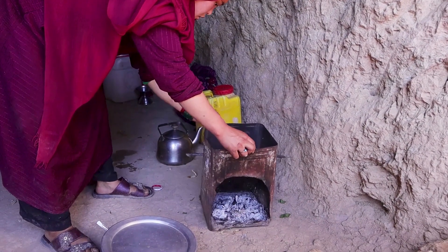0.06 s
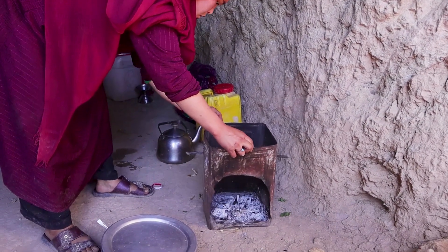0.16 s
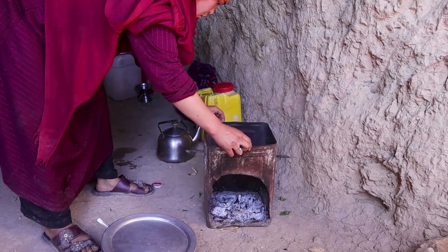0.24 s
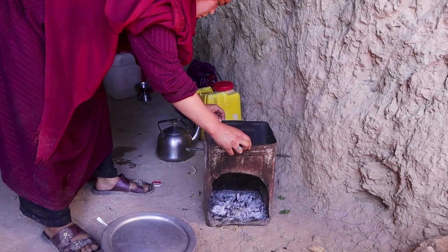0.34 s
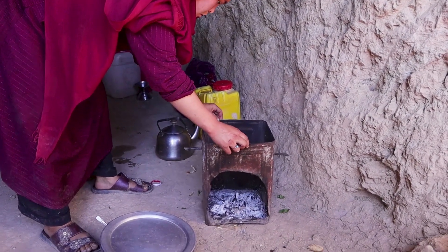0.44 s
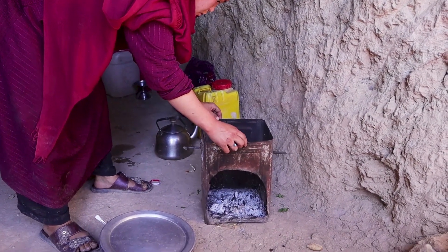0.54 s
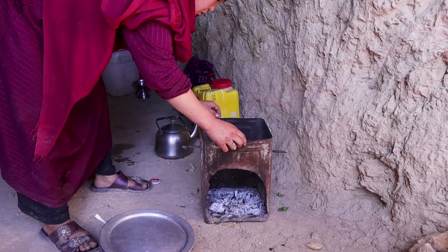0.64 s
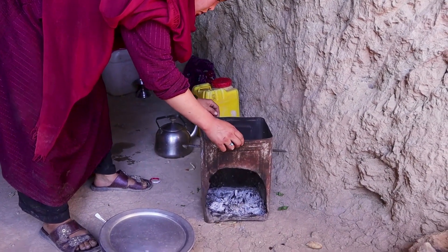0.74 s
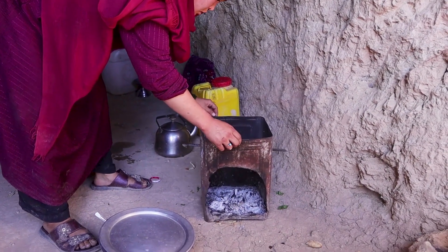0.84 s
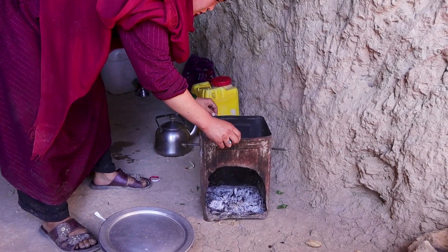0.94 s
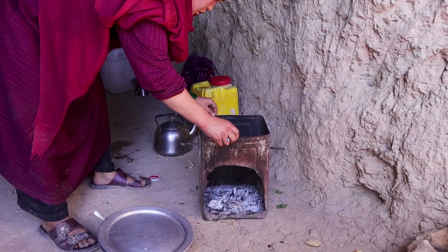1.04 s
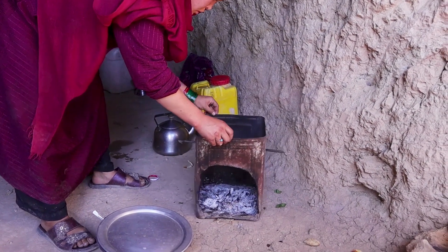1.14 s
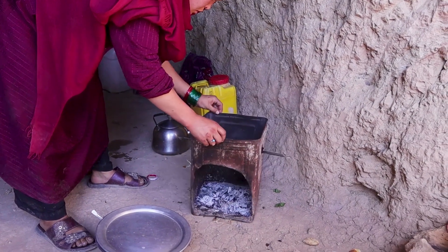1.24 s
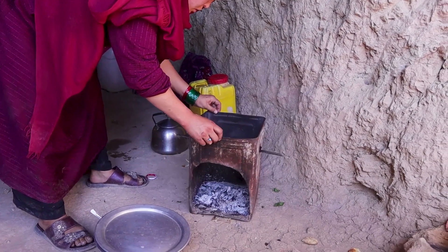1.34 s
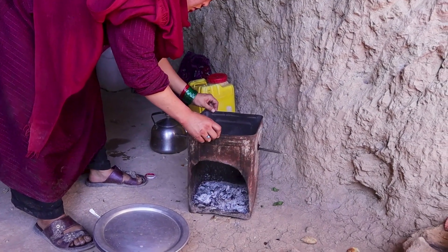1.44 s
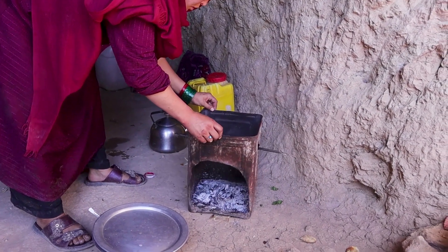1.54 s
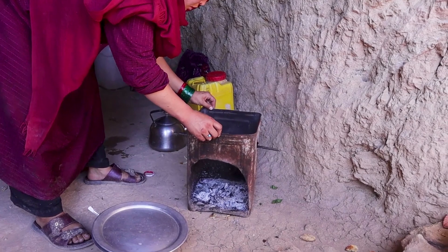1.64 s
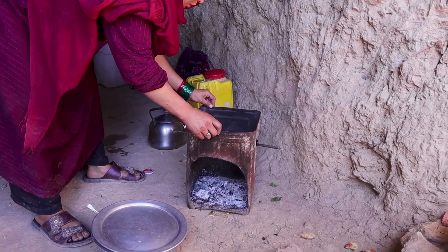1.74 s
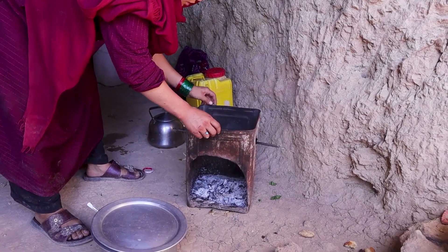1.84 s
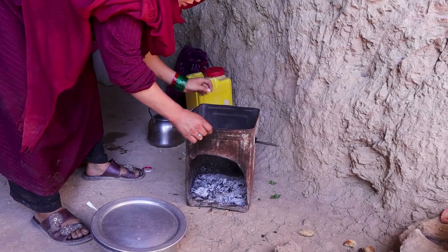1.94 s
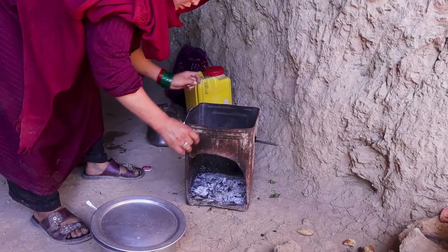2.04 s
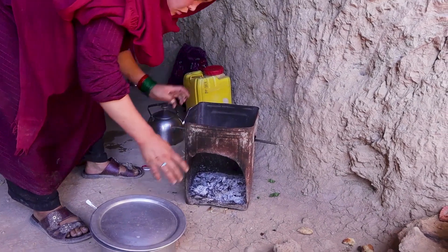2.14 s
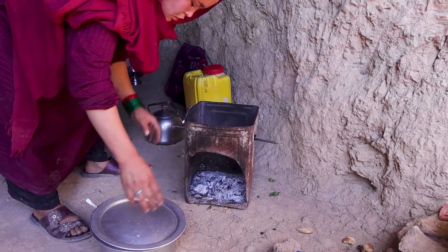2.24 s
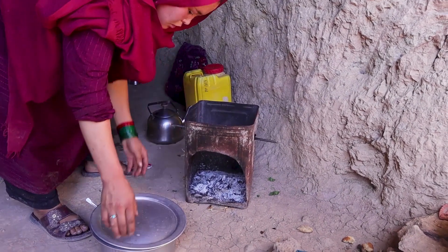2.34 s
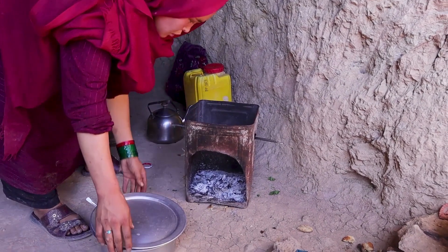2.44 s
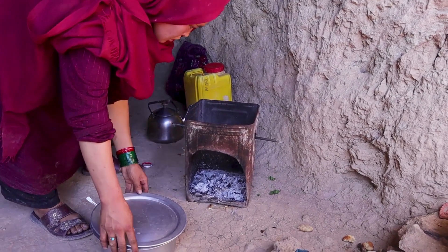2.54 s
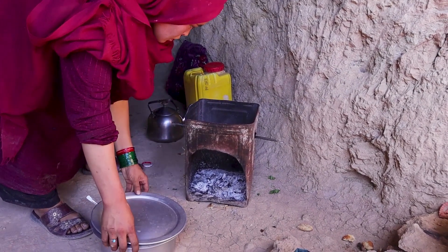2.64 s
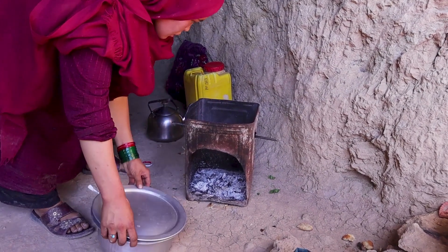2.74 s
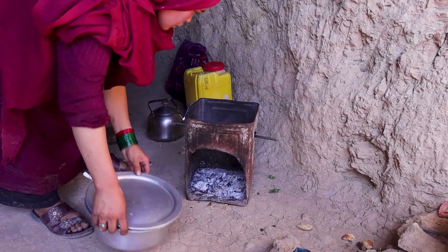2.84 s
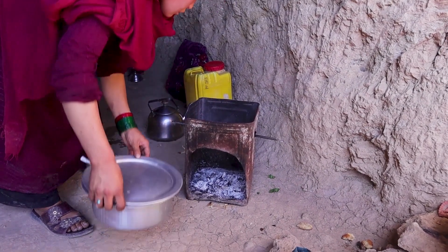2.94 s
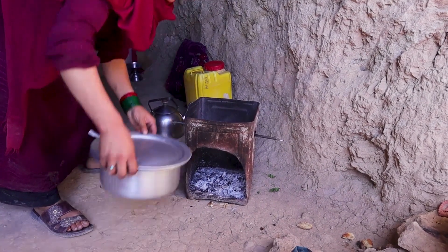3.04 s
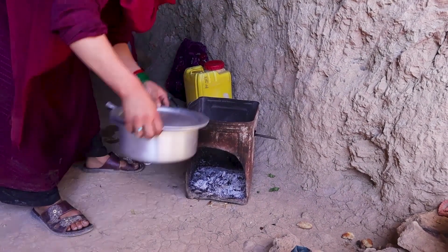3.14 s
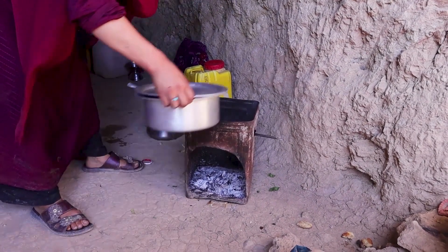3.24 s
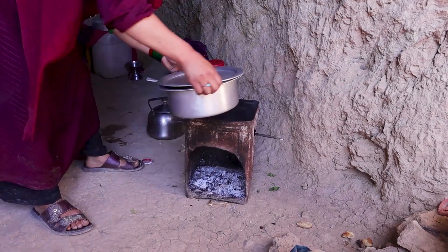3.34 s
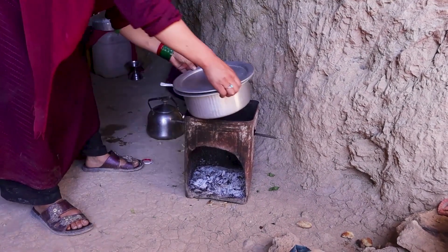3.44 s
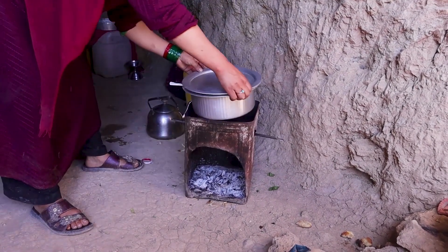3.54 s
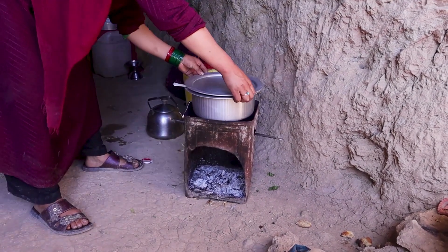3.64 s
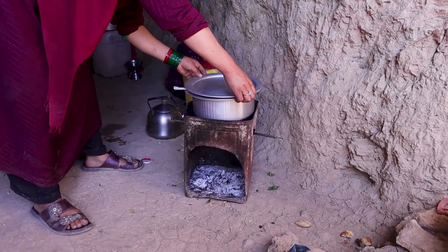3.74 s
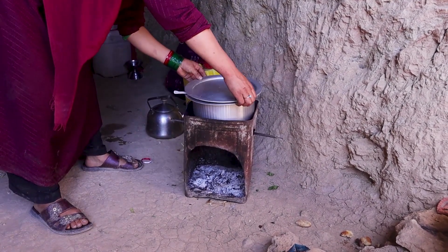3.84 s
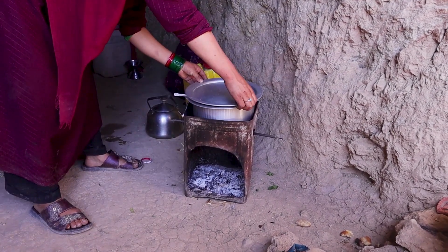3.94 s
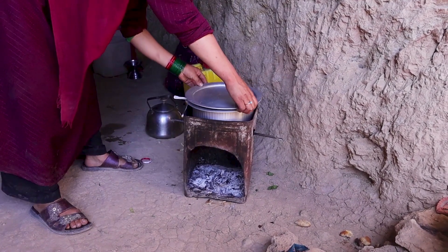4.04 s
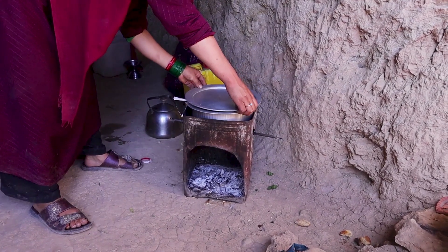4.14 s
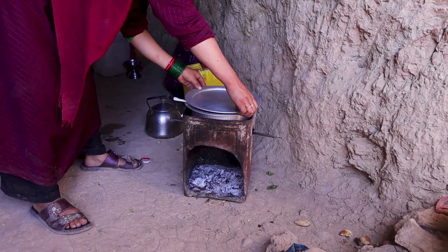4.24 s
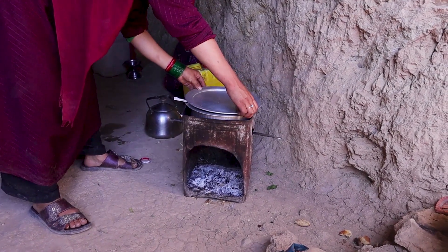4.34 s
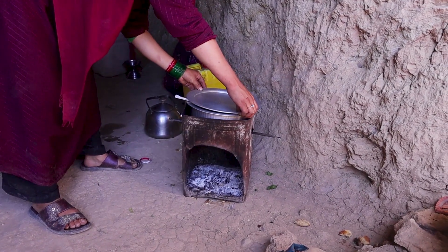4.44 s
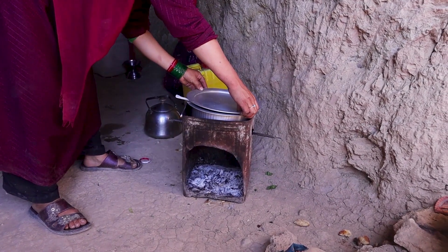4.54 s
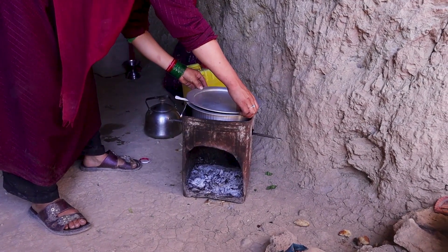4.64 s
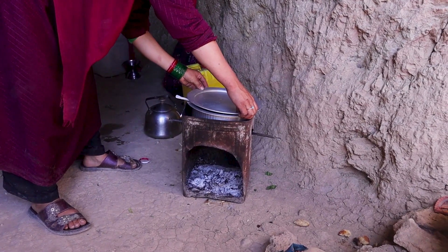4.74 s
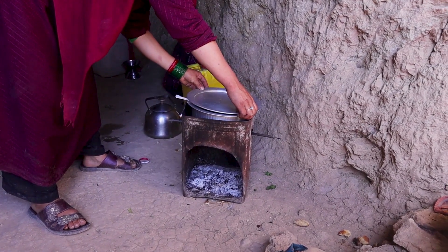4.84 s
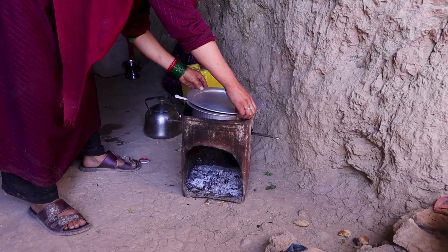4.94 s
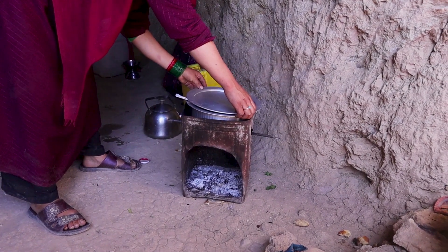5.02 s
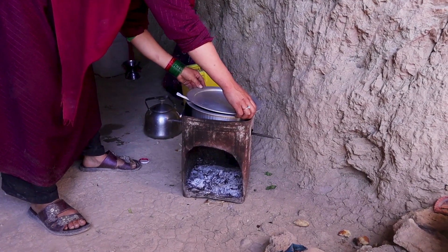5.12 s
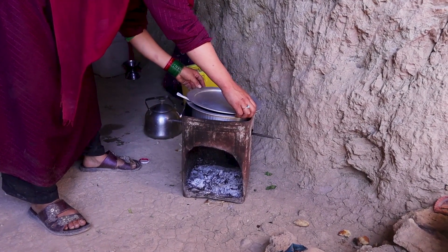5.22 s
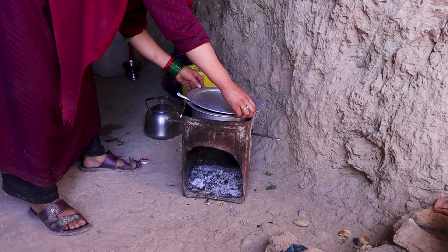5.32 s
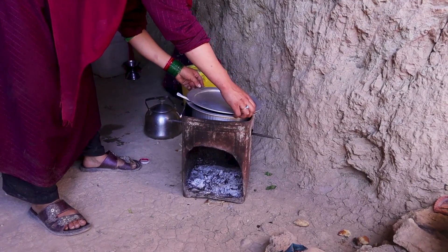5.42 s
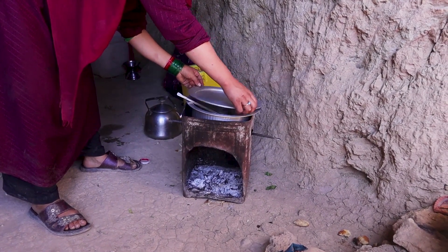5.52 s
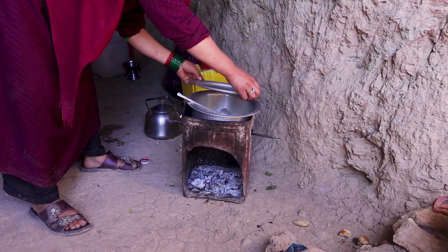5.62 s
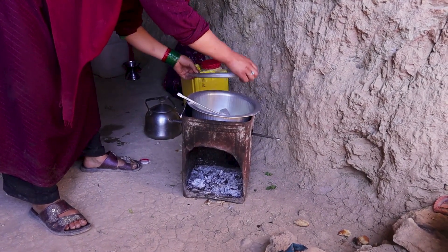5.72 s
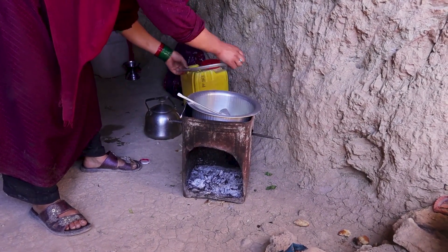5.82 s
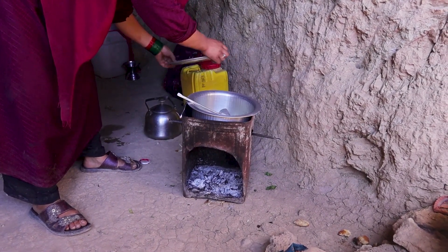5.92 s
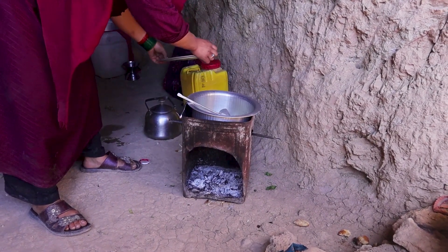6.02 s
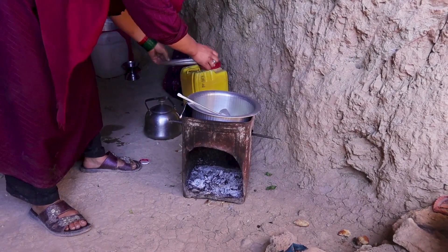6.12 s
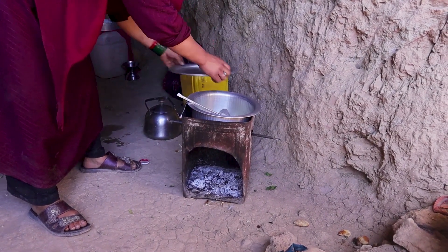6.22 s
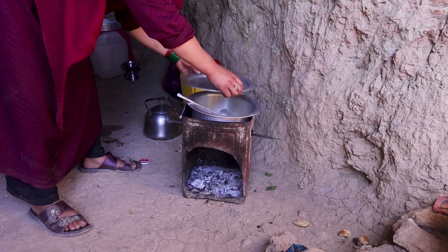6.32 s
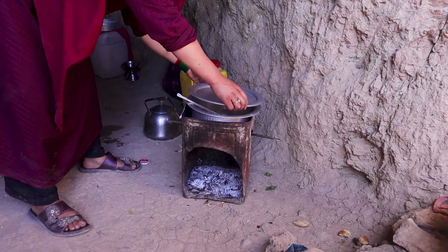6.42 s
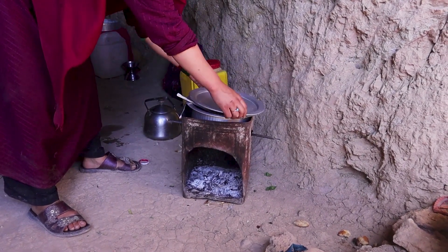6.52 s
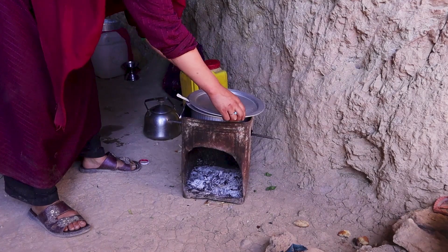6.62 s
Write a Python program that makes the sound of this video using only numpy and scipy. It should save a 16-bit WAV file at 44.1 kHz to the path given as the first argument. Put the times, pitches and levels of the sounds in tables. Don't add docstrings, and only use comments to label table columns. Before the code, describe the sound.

Nearly mono, close pickup beside a rock wall, with a faint far hush, slight hiss and low puffs of wind. From 0.1 to 0.6 s an iron rod knocks a thin tin stove, each blow chattering and ringing briefly over soft low thuds. At 1.0 to 1.25 s a rod scrapes the rim; from 1.3 to 1.95 s harder, hollow knocks follow irregularly. Wind swells around 2.2 to 2.6 s. From 2.65 to 3.2 s an aluminium pot is lifted, its loose lid rattling fast and bright, loudest near 2.9, with tiny gritty bangle ticks. It lands with a hollow clank at 3.6 and wobbles until 4.0. Between 4.3 and 4.9 it is rocked in heavy boomy bangs. Wind puffs rumble at 5.1 to 5.5. The lid clangs thinly off at 5.6, with faint brushes after, and at 6.63 it claps back, short and bright.

```python
import sys
import numpy as np
from scipy import signal
from scipy.fft import rfft, irfft
from scipy.io import wavfile
from scipy.ndimage import uniform_filter1d

SR = 44100
rng = np.random.default_rng(int(sys.argv[2]) if len(sys.argv) > 2 else 0)


def gain_from_db(level_db):
    decades = np.asarray(level_db, float) / 20
    return 10 ** decades


def master(y):
    cut = np.clip(np.atleast_2d(y).T, -1, 1)
    pcm = np.round(cut * 32767)
    wavfile.write(sys.argv[1], SR, pcm.astype(np.int16))


N = 294235

# clang lift [dB], tick of a firm knock [dB], tick per ring [dB per dB].
ROD_TOUCH = (0.35, -58, 0.62)
# frequency [Hz], t60 [s].
EMPTY_T60 = [(110, 0.6), (400, 0.42), (1000, 0.43), (2500, 0.073), (6000, 0.42), (12000, 0.022)]
# frequency [Hz], t60 [s].
PAN_T60 = [(110, 0.15), (300, 0.12), (1000, 0.17), (2500, 0.097), (6000, 0.058), (12000, 0.04)]
# frequency [Hz], level [dB per Hz].
TIN_SHEET = [(53, -41), (90, 7.5), (169, -6.5), (201, -19), (303, 2), (620, -16), (876, -6.5), (1680, -19),
             (2890, -21.5), (3590, -35), (16000, -68)]
# frequency [Hz], level [dB per Hz].
PAN_SHEET = [(53, -48), (90, -33), (290, -6.5), (676, -19), (956, -11), (1190, -24), (1750, -10.5),
             (2890, -5), (3830, -26), (10100, -34.5), (16000, -46)]
BAND_EDGES_HZ = [140, 600, 1500, 3600, 16000]
FIRM_RING_DB = -40


def first_knock(weak):
    blows = [
        (.016, -45, -63.5, 0.09),
        (.116, -61.5, -58, 0.024),
        (.143, -40, -45, 0.032),
        (.162, -31, -41, 0.03),
        (.205, -43, -54, .015),
        (.32, -49.5, -57, 0.046),
    ]
    strong = [(635.2, -43.5), (845.2, -51), (995.9, -48), (1238, -75), (1685, -77), (2207, -59),
              (2853, -51), (3031, -61), (250, -50), (305, -59.0), (350, -45.0), (400, -45.5), (560, -52.0),
              (690, -46)]
    stove = body(strong, PAN_T60, weak, TIN_SHEET, crowd_db=0.0)
    return knocks(blows, ROD_TOUCH, stove, 3.4, bounce_db=-13.5, deep_db=-4.0)


def first_rod(weak):
    blows = [
        (.407, -35.5, -49.5, 0.037),
        (.43, -32.5, -53, 0.019),
        (.465, -38.5, -56, 0.028),
        (.477, -37, -58, 0.01),
        (.52, -48, -55.5, 0.045),
        (.551, -36.5, -47, 0.032),
        (.78, -61, -68, .0086),
    ]
    strong = [(305, -63), (371, -49.5), (398, -51.0), (430, -44), (511, -60), (845.2, -54.5), (920.5, -54),
              (1001, -60), (1244, -62), (1427, -69), (1814, -71), (2223, -65), (2536, -72), (2649, -61)]
    stove = body(strong, EMPTY_T60, weak, TIN_SHEET, crowd_db=-3.0)
    return knocks(blows, ROD_TOUCH, stove, 2.4, bounce_db=-15.0, deep_db=-13.0, contact_s=0.00098)


def scrape(weak):
    blows = [
        (1.003, -50, -53.5, 0.053),
        (1.025, -51, -53, 0.048),
        (1.07, -54, -54, 0.022),
        (1.10, -52.5, -73, 0.17),
        (1.2, -46.5, -60, 0.3),
    ]
    touch = (-2, -57.5, 0.53)
    strong = [(522, -66), (1007, -61), (1114, -61), (1976, -54), (2080, -60), (2250, -58), (2420, -53),
              (2520, -50), (2665, -51), (2950, -56)]
    rim = body(strong, EMPTY_T60, weak, TIN_SHEET, crowd_db=4.0)
    return knocks(blows, touch, rim, 2.8, bounce_db=-10.0, deep_db=-3.0)


def second_rod(weak):
    blows = [(1.3, -30, -40.5, .12), (1.344, -31, -37, 0.031), (1.379, -46, -43, 0.015),
             (1.519, -34, -41.5, 0.039), (1.557, -42.5, -52, 0.024), (1.768, -38.5, -45, 0.05),
             (1.828, -36, -39.5, 0.035), (1.869, -48, -50.5, 0.044), (1.439, -37.5, -79, 0.071),
             (1.609, -40.5, -71, 0.038), (1.659, -43.5, -55.5, 0.035), (1.909, -50, -67, 0.012),
             (1.945, -51, -73, .0057)]
    strong = [(285, -54.0), (371, -44.5), (398, -44.5), (432, -44.5), (512, -55.0), (760.0, -53),
              (860, -50.5), (980, -52.5), (576, -50), (300, -50), (335, -51.5), (1206, -48.0), (1620, -72),
              (1680, -78), (1787, -57), (1870, -71), (1943, -66), (2304, -50.5), (2330, -67), (2430, -68),
              (2530, -79), (2770, -52.0), (3010, -63), (3165, -77)]
    stove = body(strong, EMPTY_T60, weak, TIN_SHEET, crowd_db=6.0)
    return knocks(blows, ROD_TOUCH, stove, 2.4, bounce_db=-14.5, deep_db=-10.5, contact_s=0.0026)


def lift(weak):
    blows = [(2.655, -42, -56, 0.056), (2.764, -31, -43, 0.025), (2.875, -21.5, -28.5, 0.01),
             (2.916, -30, -30, 0.015), (2.982, -25.5, -32, 0.0051), (3.009, -30, -39, 0.014),
             (3.058, -30, -36, 0.02), (3.079, -40, -42, 0.012), (3.107, -33.5, -40.5, 0.024),
             (3.147, -35.5, -45, 0.023), (3.122, -42, -46.5, .012), (2.889, -31, -48, .005),
             (2.69, -44, -69, .04), (3.189, -42, -55.5, 0.015), (2.75, -42, -57, 0.0091),
             (2.85, -40, -61, 0.0078)]
    touch = (0.28, -51.0, 1.2)
    strong = [(228, -52), (262, -39.0), (290, -45), (355, -49.0), (474, -51.5), (860, -47.5), (933, -43),
              (976, -39.0), (1410, -52), (1443, -70), (1572, -38.5), (1915, -39.5), (2089, -41.5),
              (2299, -50), (2492, -46), (2740, -36.5), (2799, -43), (2960, -43), (3079, -48), (3144, -64),
              (3316, -46.0), (3520, -46.0), (4323, -66), (4680, -58.5), (5076, -63), (5975, -64),
              (6708, -84), (5700, -70)]
    pot = body(strong, PAN_T60, weak, PAN_SHEET, crowd_db=-5.0)
    return knocks(blows, touch, pot, 2.65, bounce_db=-14.5, deep_db=0.5)


def set_down(weak):
    blows = [
        (3.598, -26, -34.5, 0.031),
        (3.625, -30, -39, 0.072),
        (3.575, -63, -62, .0048),
        (3.69, -34, -47.5, 0.054),
        (3.725, -35, -51.5, 0.035),
        (3.79, -42, -58, .04),
        (3.895, -44.5, -70, .004),
        (4.0, -51, -67.5, 0.052),
    ]
    touch = (1.4, -57.5, 1.5)
    strong = [(230, -50.5), (282, -41), (309, -36.5), (334, -39), (360, -38.5), (395, -45.0), (438, -49),
              (542, -40.5), (683.7, -47.5), (770, -56), (880, -47.5), (1453, -54.5), (974.0, -53.5),
              (1082, -50), (1770, -59), (2089, -69), (2546, -75), (2611, -75), (2880, -49.0), (2998, -53)]
    # frequency [Hz], t60 [s].
    t60 = [(110, 0.34), (300, 0.93), (500, 0.28), (1000, 0.69), (2500, 0.17), (6000, 0.18), (12000, .05)]
    stove = body(strong, t60, weak, TIN_SHEET, crowd_db=1.5)
    return knocks(blows, touch, stove, 1.2, bounce_db=-14.0, deep_db=-12.0)


def rocking(weak):
    blows = [(4.232, -52, -77, .025), (4.328, -22.5, -42, 0.041), (4.359, -33.5, -42, 0.024),
             (4.399, -36, -58, 0.027), (4.476, -44, -52, .03), (4.561, -34.5, -49.5, 0.11),
             (4.595, -24, -34.5, 0.035), (4.641, -31.5, -51.5, 0.12), (4.77, -25, -40, 0.04),
             (4.808, -28.5, -49, 0.041), (4.869, -33, -51, 0.022), (4.9, -37, -58, .04),
             (4.835, -32, -52, .02)]
    touch = (-2.1, -59, 0.62)
    strong = [(262, -44.5), (287, -38), (312, -31.5), (340, -42.5), (362, -32.5), (400, -46.0), (432, -41),
              (470, -58), (506.0, -47.5), (834.4, -42.5), (1157, -45.5), (1249, -43.5), (1480, -56),
              (1626, -53), (1782, -59), (1863, -48.0), (2218, -56), (2277, -77), (2358, -81), (2659, -50),
              (3079, -71)]
    # frequency [Hz], t60 [s].
    t60 = [(200, 0.5), (265, 0.5), (312, .28), (362, 0.3), (432, .45), (500, 0.5), (1000, 0.36),
           (2500, 0.23), (4000, .15)]
    stove = body(strong, t60, weak, TIN_SHEET, crowd_db=0.0)
    return knocks(blows, touch, stove, 3.6, bounce_db=-15.0, deep_db=-15.5)


def lid_off(weak):
    blows = [
        (5.617, -41, -40.5, 0.02),
        (5.649, -42, -53, 0.03),
        (5.741, -50, -72, 0.024),
        (5.877, -54, -88, .018),
        (5.588, -62, -67, 0.03),
        (6.09, -64, -74, .0089),
    ]
    touch = (5, -58, 0.41)
    strong = [(269.2, -56), (355.3, -55), (562, -62.5), (880, -52), (994, -49), (1249, -60), (1314, -55),
              (702, -56), (1540, -54), (1906, -68), (2218, -50), (2410, -45.5), (2692, -50), (2810, -72),
              (3101, -82), (3488, -80), (4420, -76)]
    lid = body(strong, PAN_T60, weak, PAN_SHEET, crowd_db=-9.5)
    return knocks(blows, touch, lid, 1.7, bounce_db=-17.5, deep_db=1.0)


def lid_back(weak):
    blows = [
        (6.6265, -35.5, -38, 0.0097),
        (6.643, -40, -41.5, 0.0087),
    ]
    touch = (5, -44.0, 1.6)
    strong = [(410, -28), (800, -39.5), (880, -37), (1300, -48.5), (2100, -49), (2450, -29), (2800, -40),
              (3350, -34), (4120, -46), (4700, -43.5), (5180, -47), (5500, -44), (6020, -54), (7300, -66)]
    pot = body(strong, PAN_T60, weak, PAN_SHEET, crowd_db=-6.0)
    return knocks(blows, touch, pot, 1.2, bounce_db=-17.0, deep_db=-8.0)


def knocks(table, touch, metal, spot_db, bounce_db, deep_db,
           bounce_spread_db=2.5, bounce_rate=1000., contact_s=0.00056):
    out = np.zeros(N + 2 * SR)
    strong, weak = metal
    clang_db, tick_db, tick_slope = touch
    for s, boom_db, ring_db, chatter_s in table:
        clang_level = (boom_db + ring_db) / 2 + clang_db
        tick_level = tick_db + tick_slope * (ring_db - FIRM_RING_DB)
        levels_db = np.array([boom_db, clang_level, ring_db, tick_level])

        chance = rng.random((400, 3))
        when = np.cumsum(-np.log(chance[:, 0])) / bounce_rate
        size = gain_from_db(bounce_db - bounce_spread_db * np.log(chance[:, 1]))
        size = size * np.exp(-when / max(chatter_s, .002))
        blow, patter = np.zeros((2, SR // 3))
        blow[0] = 1
        at = np.minimum(when * SR, SR // 3 - 1).astype(int)
        np.add.at(patter, at, size * np.sign(chance[:, 2] - .5))

        parts = ring(strong, spot_db, blow + gain_from_db(deep_db) * patter, s)
        parts = parts + ring(weak, spot_db, blow + patter, s)
        parts = parts * (1 - np.exp(-np.arange(parts.shape[1]) / SR / contact_s))
        loudest = np.sqrt(uniform_filter1d(parts[:, :SR // 8] ** 2, SR // 100).max(axis=1))
        sound = (gain_from_db(levels_db) / loudest) @ parts
        start = int(s * SR)
        out[start:start + len(sound)] += sound
    return out[:N]


def ring(modes, spot_db, blow, s):
    hz, gain, sines = modes
    share = gain * spot_gain(s, hz) * gain_from_db(spot_db * rng.standard_normal(len(hz)))
    share = share * rng.choice([-1, 1], len(hz))
    band = np.digitize(hz, BAND_EDGES_HZ) - 1
    band_share = (band == np.arange(4)[:, None]) * share
    parts = band_share.astype(np.float32) @ sines
    return signal.fftconvolve(parts, blow[None] / np.sqrt(np.sum(blow ** 2)), axes=1)


def spot_gain(s, hz):
    # from [s], boom tone [Hz], clang tone [Hz].
    spots = [(0, 435, 1000), (.136, 350, 947), (.2, 427, 860), (.3, 280, 1000), (.4, 420, 826),
             (.455, 430, 860), (.54, 382, 1000), (.99, 520, 2010), (1.29, 300, 980), (1.335, 370, 863),
             (1.37, 400, 870), (1.51, 335, 760), (1.55, 293, 880), (1.65, 419, 1010), (1.76, 410, 860),
             (1.82, 383, 760), (1.86, 397, 860), (2.64, 292, 2700), (2.76, 350, 976), (2.865, 290, 2960),
             (2.91, 350, 2300), (2.97, 255, 2492), (3.05, 281, 2780), (3.1, 280, 860), (3.14, 260, 1910),
             (3.59, 300, 880), (3.62, 310, 2900), (3.72, 360, 1050), (4.32, 304, 942), (4.35, 430, 1040),
             (4.39, 269, 945), (4.585, 358, 827), (4.63, 335, 834), (4.76, 308, 1190), (4.8, 362, 813),
             (4.86, 291, 915), (4.89, 430, 915), (5.6, 300, 1000), (5.64, 350, 990), (5.73, 240, 990),
             (6.6, 407, 848)]
    current = max(sum(row[0] <= s for row in spots) - 1, 0)
    _, boom_hz, clang_hz = spots[current]
    width = .07
    near_boom = np.exp(-(np.log(hz / boom_hz) / width) ** 2)
    near_clang = np.exp(-(np.log(hz / clang_hz) / width) ** 2)
    return gain_from_db(5.5 * near_boom + 5 * near_clang)


def body(strong, t60, weak, sheet, crowd_db):
    hz, db = np.transpose(strong)
    strong_modes = hz, gain_from_db(db - db.max()), fading_sines(hz, curve(t60, hz))
    weak_hz, spacing_db, weak_sines = weak
    bass_gap_db = -8 * (weak_hz < BAND_EDGES_HZ[1])
    crowd_gain = gain_from_db(curve(sheet, weak_hz) + spacing_db + crowd_db + bass_gap_db)
    return strong_modes, (weak_hz, crowd_gain, weak_sines)


def crowd(count=900):
    # frequency [Hz], t60 [s].
    t60 = [(110, 0.3), (400, 0.25), (1000, 0.18), (2500, 0.15), (6000, 0.05), (12000, 0.02)]
    chance = rng.random((count, 2))
    hz = 100 + 15800 * chance[:, 0] ** 2
    spacing_db = 10 * np.log10(chance[:, 0] + .05)
    return hz, spacing_db, fading_sines(hz, curve(t60, hz) * (.5 + chance[:, 1]))


def fading_sines(hz, ring_s):
    t = (np.arange(int(.5 * SR)) / SR).astype(np.float32)
    decay = np.log(1000) / np.clip(ring_s, .01, 1.5)
    fade = np.exp(-t * decay[:, None].astype(np.float32))
    return fade * np.sin(t * (2 * np.pi * hz)[:, None].astype(np.float32))


def curve(points, hz):
    at, value = np.transpose(points)
    return np.interp(np.log(np.maximum(hz, 1)), np.log(at), value)


def thuds():
    # start [s], lower mode [dB], upper mode [dB].
    bumps = [(0.151, -33, -36), (0.351, -43, -42.5), (0.418, -38, -47), (0.517, -40, -45),
             (1.298, -29.5, -25.5), (1.348, -36, -34), (1.531, -36.5, -45), (1.659, -37, -44),
             (2.875, -41.5, -35.5), (2.98, -42, -36.5), (3.599, -36, -31.5), (3.648, -45, -34),
             (4.325, -37, -48), (4.562, -35, -35.5), (4.596, -34, -35), (4.769, -45, -46)]
    wall_hz = [116.5, 173.7]
    out = np.zeros(N + SR)
    for s, low_db, high_db in bumps:
        t60 = 0.38 + .008 * (FIRM_RING_DB - max(low_db, high_db))
        hz = np.array(wall_hz) * (1 + 0.027 * rng.standard_normal(2))
        sines = fading_sines(hz, np.array([t60, 0.71 * t60]))
        rise = 1 - np.exp(-np.arange(sines.shape[1]) / SR / 0.0037)
        start = int(s * SR)
        out[start:start + len(rise)] += rise * (gain_from_db(np.array([low_db, high_db])) @ sines)
    return out[:N]


def ticks():
    # start [s], peak [dB], fade [s], centre [Hz].
    spits = [(.137, -52, .005, 8000), (.165, -53, 0.011, 5960), (.776, -58, .003, 7000),
             (1.02, -62, .03, 5000), (1.303, -51, .012, 4800), (1.35, -56, .02, 5500),
             (1.39, -60, .003, 9000), (1.939, -51, .004, 8000), (2.75, -57, .003, 8000),
             (2.917, -41, 0.011, 9000), (2.981, -47, .008, 9500), (2.875, -49, .004, 11000),
             (3.01, -52, .006, 8000), (3.078, -49, 0.0092, 9500), (3.12, -53, .008, 6500),
             (3.559, -59, .003, 4800), (3.574, -55, 0.0046, 5500), (3.6, -51, 0.011, 5900),
             (3.66, -61, 0.023, 5270), (3.787, -65, .002, 8500), (3.89, -59.5, .005, 7500),
             (4.35, -60, 0.014, 8500), (4.57, -62, .012, 5800), (4.598, -54, .015, 5170),
             (4.795, -61, .006, 7000), (4.845, -56, .02, 6500), (4.85, -62, .015, 9200),
             (5.067, -57, .002, 7000), (5.3, -61, .002, 7000), (5.742, -54, .005, 3800),
             (6.212, -58, .002, 7000)]
    rise_share, width, grain_db = 0.38, 0.55, 5
    out = np.zeros(N)
    t = np.arange(SR // 8) / SR
    for s, db, fade_s, hz in spits:
        grit = rng.standard_normal(len(t))
        grains = np.repeat(rng.standard_normal(len(t) // 32 + 1), 32)[:len(t)]
        grit = grit * gain_from_db(grain_db * grains)
        band = [hz / (1 + width / 2), hz * (1 + width / 2)]
        grit = signal.sosfilt(signal.butter(2, band, "bandpass", fs=SR, output="sos"), grit)
        fade = (1 - np.exp(-t / (rise_share * fade_s))) * np.exp(-t / fade_s)
        start = int(s * SR)
        out[start:start + len(t)] += gain_from_db(db) * fade * grit / grit.std()
    return out


def wind():
    # frequency [Hz], level [dB].
    colour = [(8.8, -25.5), (15, 3), (43, 5.5), (63, 9), (109, -9.5), (156, -19), (236, -11), (300, -23),
              (390, -51), (660, -120)]
    return noise(colour, 9.7, 85) * gusts() * gain_from_db(1.5 * walk(25))


def gusts():
    # time [s], peak [dB].
    puffs = [(0.0, -46.5), (.24, -52), (.43, -47), (1.24, -50), (1.72, -49), (1.95, -47.5), (2.17, -43),
             (2.28, -41), (2.46, -38), (2.59, -37.5), (2.98, -46), (3.2, -47), (4.43, -48), (4.6, -49),
             (4.87, -42.5), (5.01, -43.5), (5.12, -37), (5.37, -35), (5.5, -41), (6.05, -52), (6.3, -52)]
    breeze_db, rise_db_per_s, fall_db_per_s = -59.0, 220., 158
    t = np.arange(N) / SR
    s, db = np.transpose(puffs)[:, :, None]
    fade_db = np.where(t < s, rise_db_per_s * (t - s), fall_db_per_s * (s - t))
    return np.sqrt(gain_from_db(breeze_db) ** 2 + np.sum(gain_from_db(db + fade_db) ** 2, axis=0))


def far_hush():
    # frequency [Hz], level [dB].
    colour = [(35, -38), (60, -20.5), (108, -8.5), (156, -17.5), (238, -11), (274, -19.5), (389, -21),
              (527, -24.5), (1010, -27), (1140, -27.5), (1660, -34.5), (2710, -39), (3670, -41.5),
              (14600, -50.5), (16000, -51)]
    # frequency [Hz], width [Hz], lift [dB].
    peaks = [
        (264, 48, 4),
        (1011, 58, 7),
        (2780, 190, 7),
    ]
    # centre [s], depth [dB], width [s].
    dips = [
        (3.7, -9.5, 0.31),
        (6.75, -9.5, 0.29),
    ]
    t = np.arange(N) / SR
    hush = noise(colour, 5000, 15000)
    for hz, width, db in peaks:
        hush = hush + (gain_from_db(db) - 1) * signal.lfilter(*signal.iirpeak(hz, hz / width, SR), hush)
    low = signal.sosfiltfilt(signal.butter(1, 500, fs=SR, output="sos"), hush)
    hush = (hush - low) * gain_from_db(1.3 * walk(13)) + low * gain_from_db(4.7 * walk(23))
    dip_db = sum(db * np.exp(-((t - s) / width) ** 2) for s, db, width in dips)
    return hush * gain_from_db(-71.0 + dip_db)


def microphone_hiss():
    # frequency [Hz], level [dB].
    colour = [(12, -39), (20, -3), (65, 3.5), (116, 0.5), (328, -12), (624, -8), (2670, -18.5), (6720, -20),
              (13500, -24.5), (16000, -39)]
    return noise(colour, 20, 16000) * gain_from_db(-71.5 + 7.4 * walk(3.17))


def noise(points, lo_hz, hi_hz):
    hz = np.arange(N // 2 + 1) * SR / N
    spectrum = rfft(rng.standard_normal(N)) * gain_from_db(curve(points, hz))
    inside = (hz > lo_hz) & (hz < hi_hz)
    return irfft(spectrum, N) * N / np.sqrt(2 * np.sum(np.abs(spectrum[inside]) ** 2))


def walk(rate):
    k = int(SR / rate)
    held = np.repeat(rng.standard_normal(N // k + 1), k)
    return 0.43 * uniform_filter1d(uniform_filter1d(held, k), k)[:N]


def scene():
    weak = crowd()
    metal = first_knock(weak) + first_rod(weak) + scrape(weak) + second_rod(weak)
    metal += lift(weak) + set_down(weak) + rocking(weak)
    metal += lid_off(weak) + lid_back(weak)
    metal = signal.sosfilt(signal.butter(3, 150, "highpass", fs=SR, output="sos"), metal)
    middle = metal + thuds() + ticks() + wind() + far_hush()
    hiss = microphone_hiss()
    return np.array([middle + hiss, middle - hiss])


def roll_off(x):
    return signal.sosfilt(signal.butter(12, 16380, fs=SR, output="sos"), x)


def record(dry):
    top_cut = signal.ellip(10, .2, 60, 15760, fs=SR, output="sos")
    return roll_off(signal.sosfilt(top_cut, dry))


dry = scene()
out = record(dry)
master(out)
```